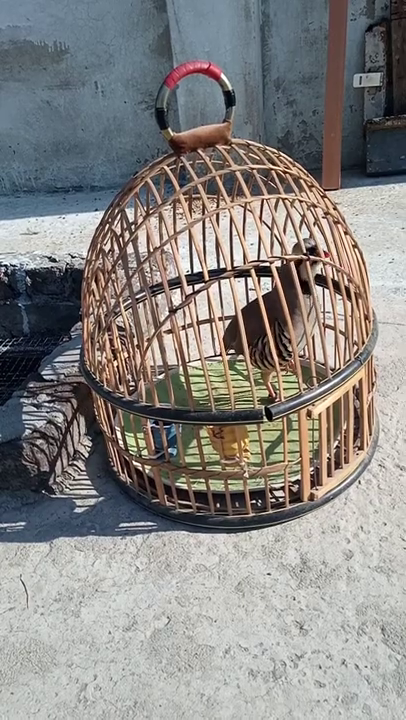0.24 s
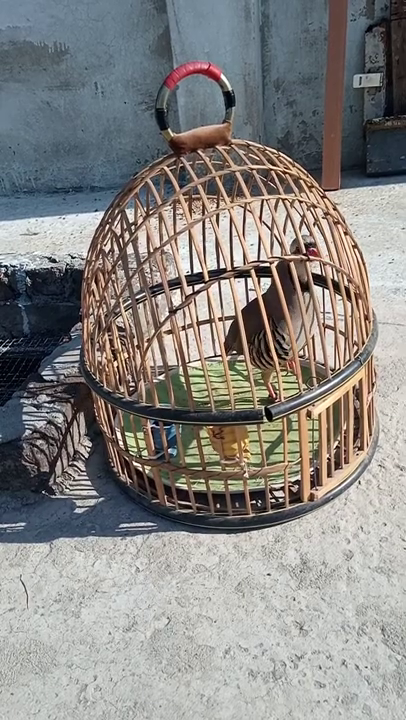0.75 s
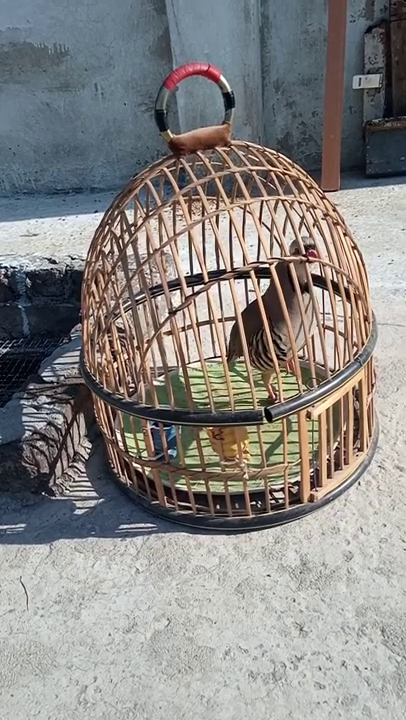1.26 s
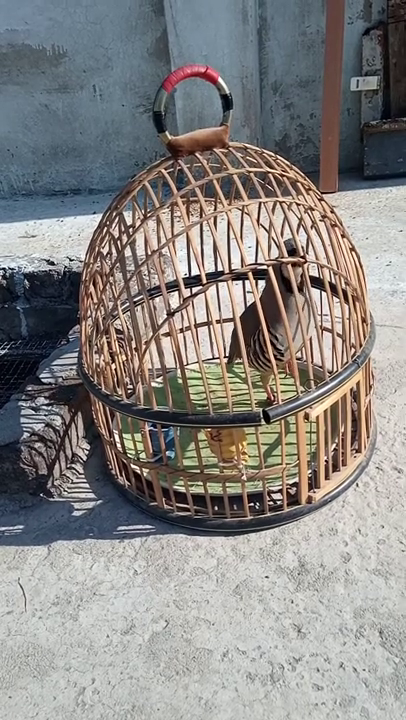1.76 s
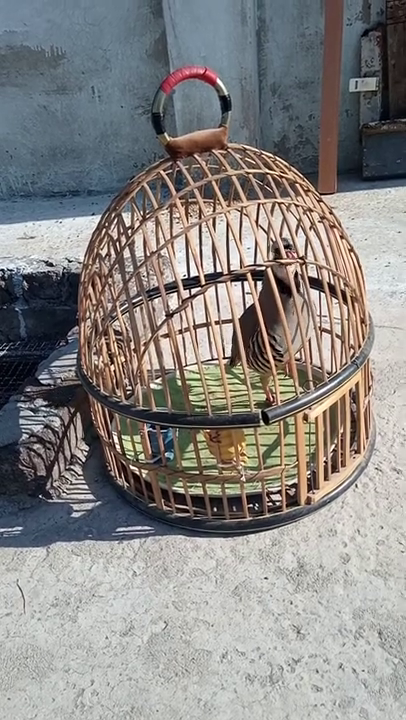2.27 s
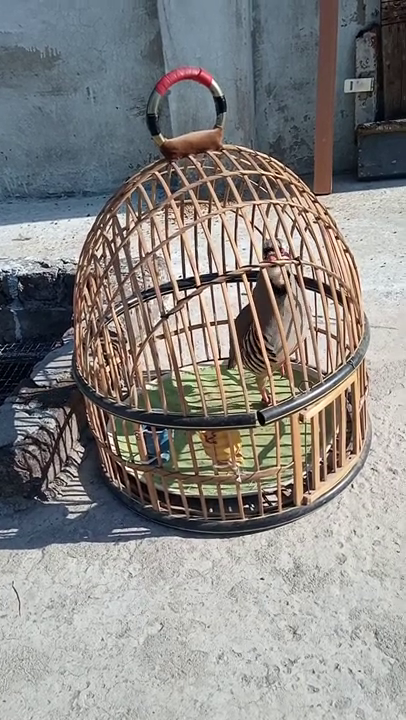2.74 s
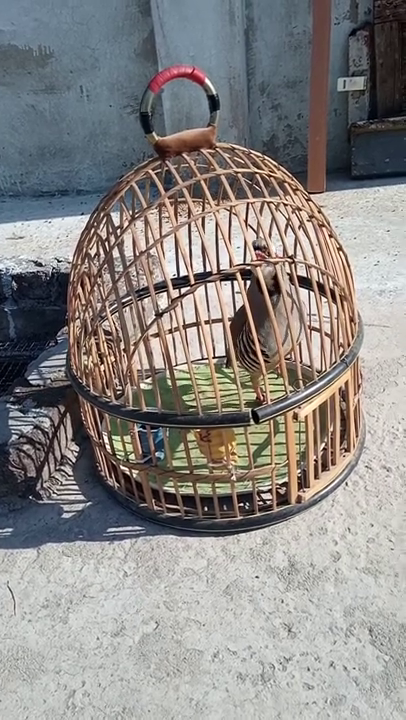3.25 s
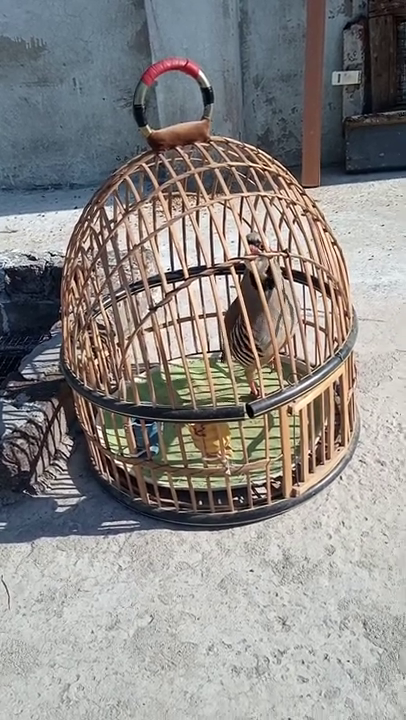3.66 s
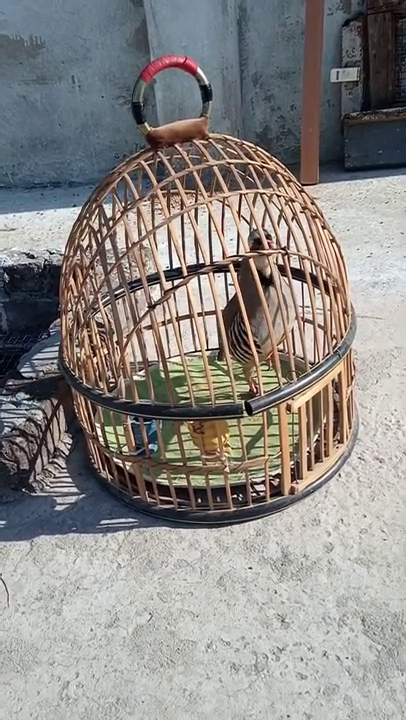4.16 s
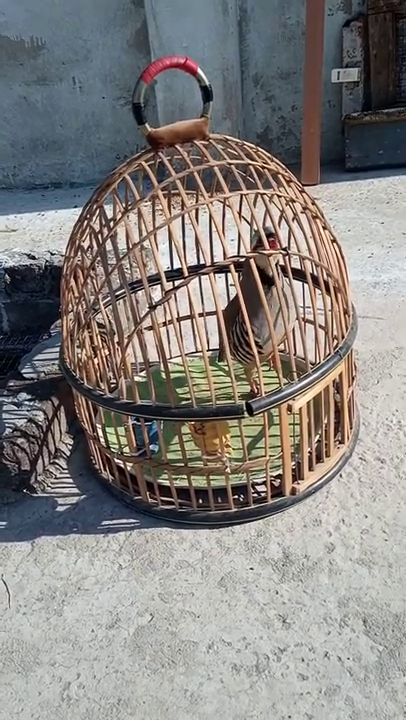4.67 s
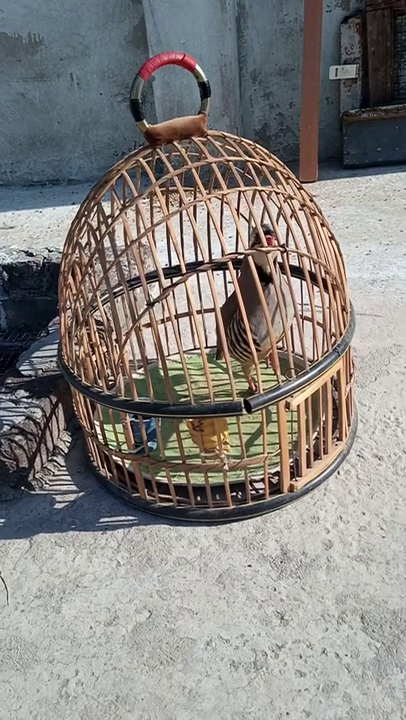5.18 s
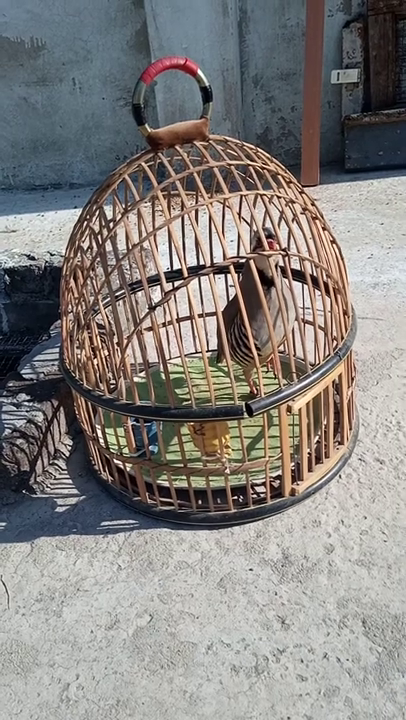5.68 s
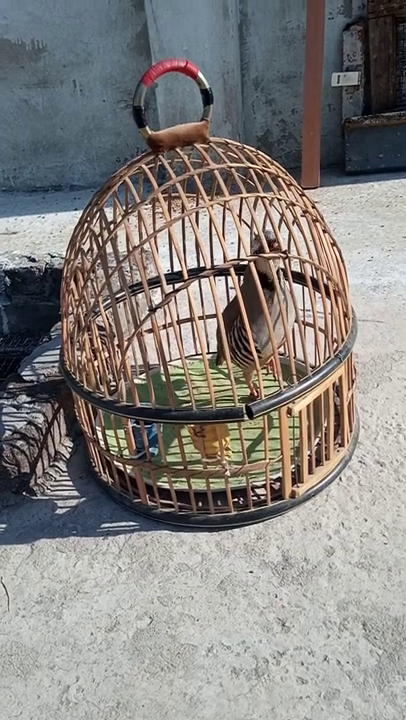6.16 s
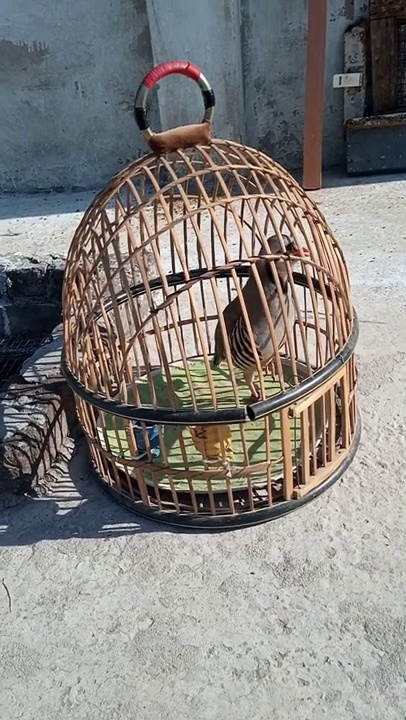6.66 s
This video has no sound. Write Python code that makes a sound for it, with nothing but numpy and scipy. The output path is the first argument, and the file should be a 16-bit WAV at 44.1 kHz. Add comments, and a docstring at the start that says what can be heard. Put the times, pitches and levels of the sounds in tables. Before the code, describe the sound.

A caged partridge calls near the microphone in a concrete yard. At 0 s a hoarse, throbbing trill of under 0.2 s is already sounding. At about 0.36 s comes a short cluck with an arched pitch near 470 Hz, then another trill; this pair repeats roughly every half second, then slightly faster. Each trill holds several rough throbs, about forty per second, and swells toward its end. Phrases grow louder, tighter and brighter until about 2.3 s, then stay strong until the last trill at 4.8-4.9 s. From 5.1 s only single clucks remain, at about 5.4, 5.6, 5.85, 6.25, 6.6 and 6.9 s, generally weaker and duller. A minute feather rustle accompanies the one near 6.6 s. Hard surfaces give quick echoes and a short noisy tail. Underneath are faint air, low distant rumble and, after 5 s, a very faint wavering whine.

```python
"""A partridge calls from a wicker cage in a concrete yard: paired membranes in its syrinx send pulses and
turbulence through resonances of throat and beak. Each phrase is a short arched cluck and then a hoarse,
throbbing trill; phrases grow louder and tighter as the neck stretches, then give way to single clucks.
Ground and walls return short echoes and a decaying tail of noise; feathers rustle once. Filtered noise
makes the still air and a low, far town rumble; wavering sines make a faint distant whine."""
import sys
import numpy as np
from scipy import signal
from scipy.fft import rfft, irfft, next_fast_len
from scipy.io import wavfile
from scipy.ndimage import uniform_filter1d, minimum_filter1d

SR = 44100
rng = np.random.default_rng(int(sys.argv[2]) if len(sys.argv) > 2 else 0)


def int16_out(signal):
    """Quantize to a 16-bit WAV file."""
    q = np.round(np.clip(np.atleast_2d(signal).T, -1, 1) * 32767)
    wavfile.write(sys.argv[1], SR, q.astype(np.int16))


N = 305169

# posture of the bird: (time [s], neck stretch [0-1])
NECK_STRETCH = [(0, 0), (.9, 0.26), (1.4, 0.49), (1.85, 0.83), (2.2, 0.98), (5.5, 0.93), (5.9, 0.32),
                (6.3, 0.55), (6.9, 0.37)]
# throat resonance, neck drawn in and stretched: (frequency [Hz], gain [dB])
THROAT_HUNCHED = [(150, -59.5), (330, -33), (450, -28.5), (600, -28.5), (780, -31.5), (1000, -11.5),
                  (1150, -4), (1330, -2.5), (1470, -7.5), (1620, -32.5), (1950, -34), (2300, -49),
                  (3000, -78.5)]
THROAT_STRETCHED = [(150, -57), (330, -48), (480, -33.5), (620, -35), (800, -42), (1000, -16), (1150, -0.5),
                    (1320, 3.5), (1470, -6.5), (1600, -18), (1950, -38.5), (2300, -45), (3000, -82)]
# upper resonances, neck drawn in and stretched: (frequency [Hz], gain [dB])
BEAK_HUNCHED = [(1500, -41.5), (2100, -19.5), (2450, 2), (2850, -18.5), (3450, -2), (4100, -3.5),
                (4650, 4.5), (5150, -15), (5500, -37.5), (6900, -28), (8200, -48.5)]
BEAK_STRETCHED = [(1500, -34.5), (2050, -19), (2500, -6), (2950, -16.5), (3500, -1.5), (3980, 4),
                  (4350, -14.5), (4950, -34.5), (5600, -23.5), (6150, -30), (6650, -18.5), (7300, -43),
                  (8200, -51)]
# closing of the beak: (time [s], share closed [0-1])
BEAK_CLOSING = [(5.3, 0), (5.9, .3), (6.25, 1)]
# change of colour by a fully shut beak: (frequency [Hz], gain [dB])
BEAK_SHUT = [(1700, 12), (2050, -2), (2400, 9), (2750, 0.5), (3000, -3), (3350, -10.5), (3650, -10.5),
             (4200, -17.5), (4800, 10), (5600, -17), (6700, -4)]
# hoarse trills: (start [s], end [s], first throb [s], throb rate [1/s], throat level [dB], beak level [dB])
TRILLS = [(0, 0.18, 0.012, 39.93, -27.5, -51.5), (0.513, 0.683, 0.524, 42.6, -26.5, -45),
          (1.005, 1.125, 1.005, 44.54, -23, -43), (1.43, 1.559, 1.443, 41.9, -20, -37),
          (1.86, 1.985, 1.876, 41.6, -17, -34), (2.281, 2.394, 2.305, 41.4, -17, -32),
          (2.705, 2.821, 2.727, 43.9, -16.5, -32), (3.128, 3.239, 3.153, 45.4, -15, -30),
          (3.538, 3.643, 3.561, 42.5, -15.5, -29.5), (3.956, 4.063, 3.979, 41.66, -16, -32),
          (4.371, 4.479, 4.395, 40.1, -16, -30.5), (4.81, 4.914, 4.835, 41.36, -15, -31.5)]
# throat turbulence during a trill: (frequency [Hz], relative density [dB per Hz])
GRAVEL = [(150, -24), (290, -11.5), (470, -3.5), (620, -4), (800, -6.5), (1000, 5), (1500, -9),
          (3000, -40.5)]
# echoes off ground and walls: (delay [s], level [dB])
ECHOES = [(.0046, -35.5), (0.0089, -13.5), (0.025, -28.5), (0.04, -26.5)]
# colour of the yard's scattered sound: (frequency [Hz], gain [dB])
YARD_COLOUR = [(150, -4), (300, 11.5), (500, 8.5), (900, 10.5), (1350, -4.5), (1620, 9), (2000, 7.5),
               (2500, -3), (3400, -11), (4000, -3.5), (5000, -5.5), (6000, 2), (7200, -13), (9000, -8.5)]
# town rumble, colour: (frequency [Hz], relative density [dB per Hz])
TOWN_RUMBLE = [(25, -36), (55, -11), (105, 3.5), (160, -3), (250, -16.5), (450, -25), (900, -49),
               (3000, -77)]
# town rumble, mean course of its level: (time [s], level [dB])
TOWN_LEVEL = [(0, -63), (3, -64.5), (5.5, -63.5), (6.9, -60.5)]
# open air, colour: (frequency [Hz], relative density [dB per Hz])
AIR_COLOUR = [(100, -12), (250, 1), (450, -2.5), (720, -7.5), (1000, -3.5), (1350, -5), (2000, -13),
              (2800, -25), (3500, -28.5), (5000, -38.5), (6300, -41.5), (7200, -32.5), (8200, -49.5)]
# clucks: (start [s], length [s], top pitch [Hz], roughness [0-1], throat level [dB], beak level [dB])
CLUCKS = [(0.363, 0.03333, 467.2, 0.37, -24.5, -37), (0.876, 0.0317, 478.8, 0.32, -23, -33.5),
          (1.321, 0.0339, 481, 0.23, -23, -31.5), (1.756, 0.03543, 500, 0.11, -24.5, -29),
          (2.184, 0.03786, 502.5, 0.04, -23.5, -28.5), (2.606, 0.04065, 502.1, 0.21, -23, -28),
          (3.027, 0.0412, 508.9, 0.23, -22.5, -28.5), (3.437, 0.045, 499.6, 0.24, -20.5, -27.5),
          (3.852, 0.0427, 503.8, 0.19, -22, -28), (4.27, 0.0404, 498.5, 0.2, -22, -28),
          (4.696, 0.04303, 510.5, 0.21, -23, -30), (5.116, 0.02583, 465.6, 0.59, -25.5, -38),
          (5.359, 0.023, 458.8, 0.44, -24, -48.5), (5.587, 0.0265, 469.6, 0.53, -24, -43),
          (5.849, 0.02635, 460, 0.58, -32.5, -49.5), (6.258, 0.0228, 466.7, 0.31, -28, -49),
          (6.577, 0.0296, 471.1, 0.5, -32, -51.5), (6.901, 0.029, 488.7, 0.42, -33.5, -59.5)]
# distant whine: (start [s], end [s], frequency [Hz], level [dB])
WHINE_TONES = [(5.5, 6.35, 872, -59), (5.25, 6.3, 630, -70), (5.0, 6.9, 2395, -76), (5.3, 6.8, 3195, -77)]
# rustle of feathers, one row: (time [s], half-width of the swell [s], level [dB])
FEATHER_RUSTLE = (6.578, 0.0134, -57.5)
# rustle of feathers, colour: (frequency [Hz], gain [dB])
FEATHER_COLOUR = [(1500, -7), (3800, -8), (5200, 3), (6500, -9), (7500, -9.5), (8300, -27)]


def from_db(db):
    """Level and amplitude: 20 dB make a factor of ten."""
    return 10 ** (np.asarray(db) / 20)


def rms_one(x):
    """Normalisation to unit mean power."""
    return x / np.sqrt(np.mean(x ** 2) + 1e-20)


def colour(x, spectrum, other=None, blend=0):
    """Minimum-phase filtering: a causal response follows from the log magnitude, or a blend of two."""
    size = 2 * next_fast_len(len(x) + 2048)
    log_hz = np.log(np.fft.rfftfreq(size, 1 / SR) + 1)

    def curve(points):
        hz, db = np.transpose(points)
        return np.interp(log_hz, np.log(hz), db)

    db = (1 - blend) * curve(spectrum) + blend * curve(other or spectrum)
    # folding the cepstrum onto positive time makes the phase minimal
    cepstrum = irfft(np.log(from_db(db)))
    cepstrum[1:size // 2] *= 2
    cepstrum[size // 2 + 1:] = 0
    response = np.exp(rfft(cepstrum))
    return irfft(rfft(x, size) * response)[:len(x)]


def wander(count, rate):
    """Slow random fluctuation: straight lines join normal deviates drawn rate times a second."""
    knots = rng.standard_normal(int(count / SR * rate) + 3)
    return np.interp(np.arange(count) / SR * rate, np.arange(len(knots)), knots)


def gate(t, length, rise, fall):
    """Amplitude envelope: quarter-sine edges open at 0 and close at length."""
    opening = np.sin(np.pi / 2 * np.clip(t / rise, 0, 1))
    closing = np.sin(np.pi / 2 * np.clip((length - t) / fall, 0, 1))
    return opening * closing


def add(out, start, sound):
    """Superposition: pressures sum from a given time [s]."""
    i = max(int(start * SR), 0)
    out[i:i + len(sound)] += sound[:max(N - i, 0)]


def even(x, seconds, share=1):
    """Envelope flattening: division by short-term amplitude, wholly or in part."""
    local = np.abs(uniform_filter1d(x * x, max(int(seconds * SR), 2)))
    power = local + 1e-3 * np.mean(x * x)
    return rms_one(x / power ** (share / 2))


def stretch_at(when):
    """Posture as a control variable: neck stretch, 0-1, interpolated in time."""
    return np.clip(np.interp(when, *np.transpose(NECK_STRETCH)), 0, 1)


def by_posture(when, hunched, stretched):
    """Linear dependence of a quantity on neck stretch."""
    return hunched + stretch_at(when) * (stretched - hunched)


def syrinx(pitch, jitter, hoarse):
    """Self-oscillating membrane: unsteadily timed harmonic pulses, and turbulence let through each cycle."""
    count = len(pitch)
    unsteady_pitch = pitch * (1 + jitter * wander(count, rate=700))
    phase = 2 * np.pi * (rng.random() + np.cumsum(unsteady_pitch) / SR)
    harmonic = np.arange(1, 20)[:, None]
    partials = np.cos(harmonic * phase + harmonic * harmonic * np.pi / 6)
    pulses = rms_one(partials.sum(0))
    turbulence = rng.standard_normal(count) * (1 + np.cos(phase))
    return pulses + hoarse * turbulence


def throat(source, when):
    """Tract resonance: the main peak strengthens and narrows as the neck stretches."""
    return colour(source, THROAT_HUNCHED, THROAT_STRETCHED, stretch_at(when))


def beak(source, when):
    """Upper resonances: they sink and sharpen as the neck stretches; a closing beak hollows them out."""
    shut = np.clip(np.interp(when, *np.transpose(BEAK_CLOSING)), 0, 1)
    open_beak = colour(source, BEAK_HUNCHED, BEAK_STRETCHED, stretch_at(when))
    shut_colour = [(hz, shut * db) for hz, db in BEAK_SHUT]
    return rms_one(colour(open_beak, shut_colour))


def trills():
    """Beating and amplitude modulation: two unlike membranes roughen an evenly throbbing crescendo.
    In each throb the pitch falls and the membranes briefly steady, locked to the throat resonance."""
    crescendo_db_per_s, throb_scatter_db, throb_pitch_scatter = 58.5, 1.83, .022
    run_out_s, run_out_db = 0.01811, -10.5  # throbs weaken as the air runs out
    sweep, sag, sag_s = 0.0683, .22, .011  # pitch swing and final sag, as shares of the pitch
    trough, lock = 0.17, 0.6094  # amplitude between throbs; steadying at the peak of a throb
    second_pitch = 0.77  # ratio to the first membrane
    hiss, grain, rattle_lead = .4, .35, 0.34  # the lead is in throb cycles
    gravel_db = -29.5  # throat turbulence relative to the throb level
    out = np.zeros(N)
    for start, end, first_throb, rate, throat_db, beak_db in TRILLS:
        length = end - start
        t = start + np.arange(int(length * SR)) / SR
        at = np.arange(first_throb, end, 1 / rate)
        cycle = (t - first_throb) * rate
        pitch_chance, level_chance = rng.standard_normal((2, len(at)))
        hz = by_posture(start, 398.1, 448.75) * (1 + throb_pitch_scatter * pitch_chance)
        spent = np.clip(1 - (end - at) / run_out_s, 0, 1)
        db = throat_db + crescendo_db_per_s * (at - (start + end) / 2)
        db = db + run_out_db * spent + throb_scatter_db * level_chance
        effort = from_db(np.interp(t, at, db))
        # throbs grow crisper as the neck stretches
        throb_width_s = by_posture(start, 0.005694624, 0.003909984)
        offset = np.abs(t - at[:, None]).min(0)
        throb = np.exp(-.5 * (offset / throb_width_s) ** 2)
        loose = 1 - lock * throb
        # the pitch swings with each throb and sags as the air runs out
        swing = 1 - sweep * np.sin(2 * np.pi * cycle)
        final_sag = 1 - sag * np.exp((t - end) / sag_s)
        pitch = np.interp(t, at, hz) * swing * final_sag
        first = syrinx(pitch, jitter=.04 * loose, hoarse=.3 * loose)
        second = syrinx(second_pitch * pitch, jitter=.06, hoarse=.7)
        second_gain = from_db(by_posture(start, -4, -9)) * loose
        membranes = first + second_gain * second
        voice = even(throat(membranes, start), seconds=.012) * effort * (trough + throb)
        gravel = rms_one(colour(rng.standard_normal(len(t)), GRAVEL))
        low = voice + from_db(gravel_db) * effort * gravel
        low = low * gate(t - start, length, rise=0.0068, fall=0.0012)
        # the rasp is brightest before each throb, where the pitch is high
        rattle_depth = by_posture(start, 0.42, 0.19)
        rattle = 1 + rattle_depth * np.cos(2 * np.pi * (cycle + rattle_lead))
        rasp = beak(membranes + hiss * rng.standard_normal(len(t)), start)
        rasp = rasp * rattle * (1 + grain * wander(len(t), rate=300))
        high = rms_one(rasp * effort ** 0.48 * gate(t - start, length, rise=0.033, fall=0.031))
        add(out, start, low + from_db(beak_db) * high)
    return out


def yard(x):
    """Reverberation: hard echoes, quick scatter from cage and ground, and a tail between the walls."""
    t = np.arange(int(.7 * SR)) / SR
    response = np.zeros(len(t))
    # wall tail, then near scatter: level [dB], time to decay by 60 dB [s]
    for db, decay_s in ((-11.5, 0.405), (-14.5, 0.056)):
        noise = colour(rng.standard_normal(len(t)), YARD_COLOUR)
        scatter = noise * from_db(-60 * t / decay_s) * np.clip(t / 0.0046, 0, 1)
        response += from_db(db) * scatter / np.sqrt(np.sum(scatter ** 2))
    for delay, db in ECHOES:
        response[int(delay * SR)] += from_db(db)
    return x + signal.fftconvolve(x, response)[:N]


def town():
    """Low-frequency broadband noise: a far rumble whose level drifts and wavers."""
    mean_db = np.interp(np.arange(N) / SR, *np.transpose(TOWN_LEVEL))
    level_db = mean_db + 2.5 * wander(N, rate=14)
    return from_db(level_db) * rms_one(colour(rng.standard_normal(N), TOWN_RUMBLE))


def air():
    """Stationary noise: still open air at a constant mean level."""
    return from_db(-64) * rms_one(colour(rng.standard_normal(N), AIR_COLOUR))


def clucks():
    """Pressure-driven oscillation: pressure rises and falls once; pitch arches and overtones bloom."""
    droop, arch_power, bright_power = 0.22, 2.1, 1.86
    edge_hoarse, edge_jitter, hoarseness = .2, .018, .55
    out = np.zeros(N)
    for start, length, top_hz, rough, throat_db, beak_db in CLUCKS:
        t = np.arange(int(length * SR)) / SR
        crest = by_posture(start, .72, .52)  # place within the note, 0-1
        slack = np.clip(np.abs(t / length - crest) * 2, 0, 1)
        pitch = top_hz * (1 - droop * slack ** arch_power)
        # the membranes are least steady as they start and stop
        jitter = 0.22 * rough ** 2 + edge_jitter * slack ** 2
        source = syrinx(pitch, jitter, hoarse=hoarseness * rough + edge_hoarse * slack ** 2)
        swell_db = by_posture(start, 13, 6.5)  # rise over the note
        swell = from_db(swell_db * (t / length - .5)) * gate(t, length, rise=.01, fall=.005)
        low = rms_one(even(throat(source, start), seconds=0.0073, share=0.42) * swell)
        bloom = np.maximum(1.15 - slack ** 2, 0) ** bright_power
        high = rms_one(beak(source, start) * bloom * gate(t, length, rise=0.008, fall=0.0028))
        add(out, start, from_db(throat_db) * low + from_db(beak_db) * high)
    return out


def whine():
    """Frequency and amplitude modulation of sines: thin far tones swell, waver and fade."""
    waver, flicker_db = .007, 3
    t = np.arange(N) / SR
    out = np.zeros(N)
    for start, end, hz, db in WHINE_TONES:
        pitch = hz * (1 + waver * wander(N, rate=49))
        phase = 2 * np.pi * np.cumsum(pitch) / SR
        level = from_db(db + flicker_db * wander(N, rate=14))
        level = level * gate(t - start, end - start, rise=0.522, fall=0.393)
        out += np.sqrt(2) * level * np.sin(phase)  # the root of two makes the level an rms value
    return out


def rustle():
    """Friction noise under a bell-shaped envelope: feathers brush as the bird lowers its head."""
    when, half_width, db = FEATHER_RUSTLE
    swell = np.exp(-((np.arange(N) / SR - when) / half_width) ** 2)
    return from_db(db) * swell * rms_one(colour(rng.standard_normal(N), FEATHER_COLOUR))


def scene():
    """Superposition of the reverberant bird and the background of town, air and whine."""
    bird = trills() + clucks() + rustle()
    return (yard(bird) + town() + air() + whine())[None]


def record(dry):
    """Peak limiting and low-pass filtering: a quick limiter holds the loudest peaks; the top is cut."""
    ceiling, cutoff_hz = .33, 8150
    peaks = -minimum_filter1d(-np.abs(dry), size=90)
    gain = uniform_filter1d(np.minimum(1, ceiling / (peaks + 1e-9)), size=90)
    # elliptic low-pass: order 10, ripple 0.1 dB, stop band 80 dB down
    low_pass = signal.ellip(10, .1, 80, cutoff_hz, fs=SR, output="sos")
    return signal.sosfilt(low_pass, dry * gain)


dry = scene()
out = record(dry)
int16_out(out)
```